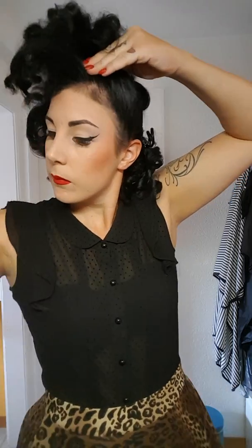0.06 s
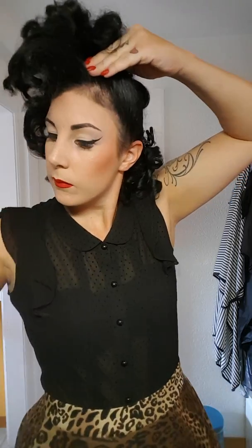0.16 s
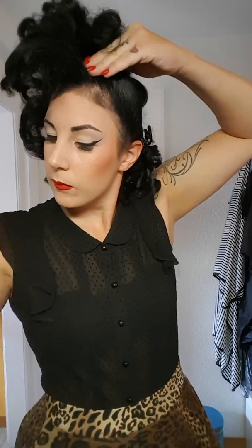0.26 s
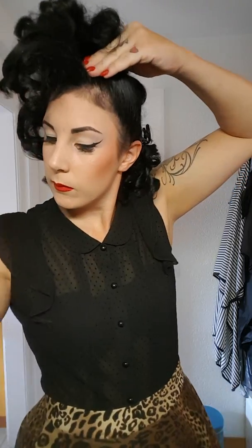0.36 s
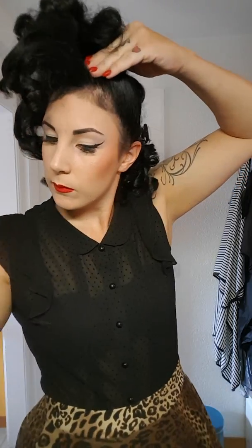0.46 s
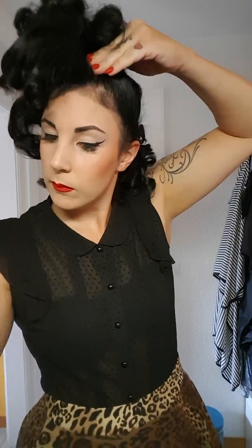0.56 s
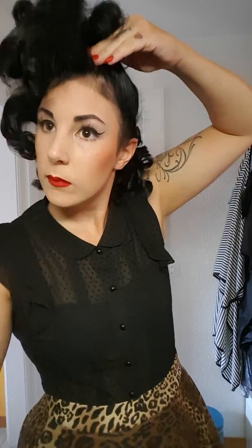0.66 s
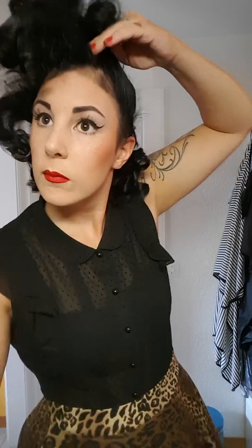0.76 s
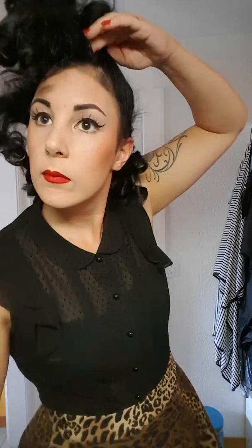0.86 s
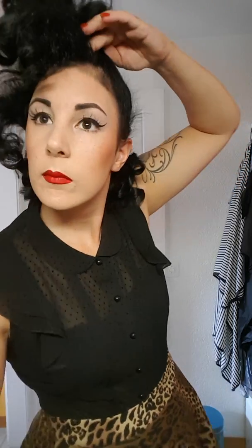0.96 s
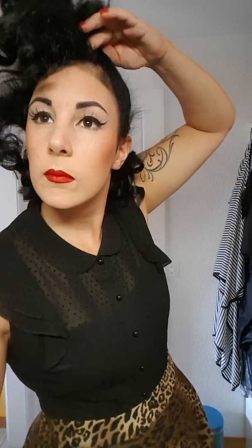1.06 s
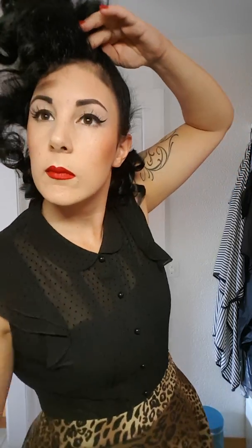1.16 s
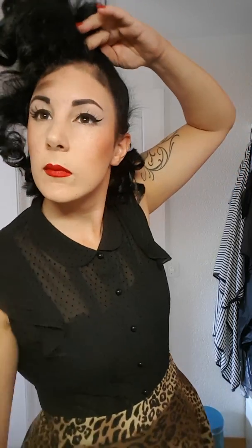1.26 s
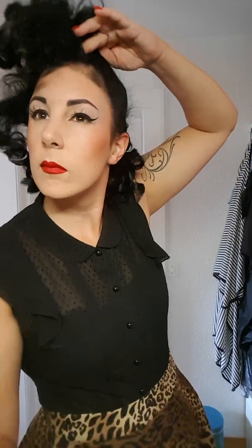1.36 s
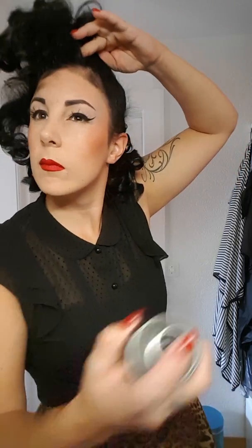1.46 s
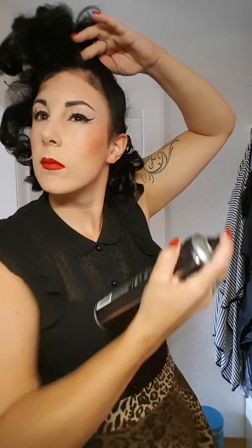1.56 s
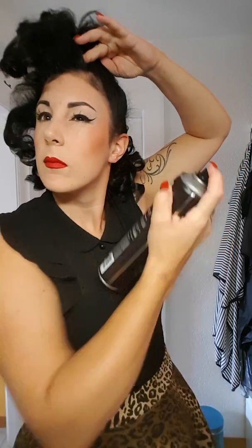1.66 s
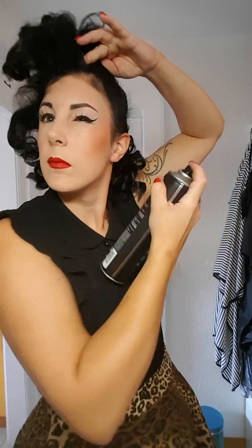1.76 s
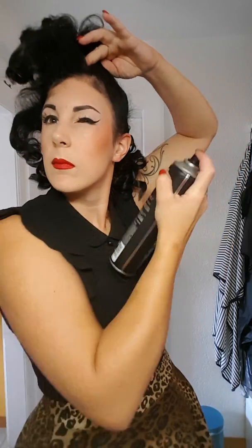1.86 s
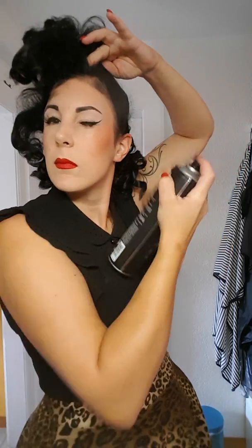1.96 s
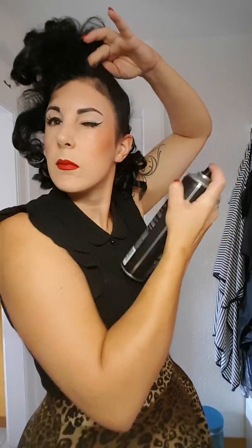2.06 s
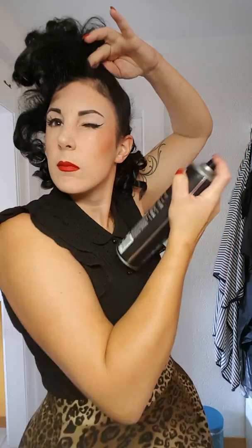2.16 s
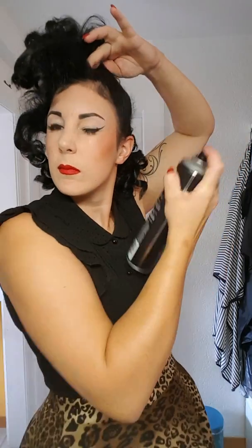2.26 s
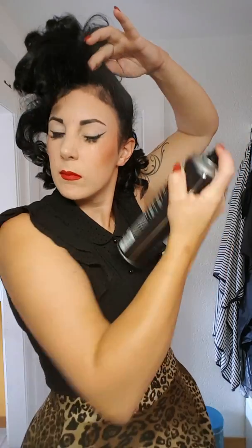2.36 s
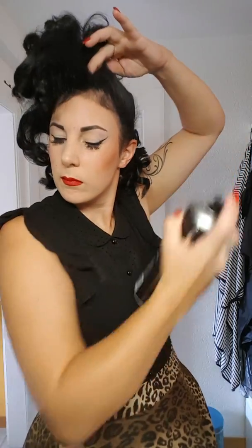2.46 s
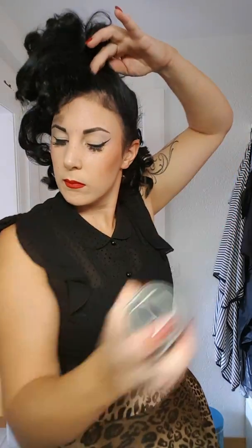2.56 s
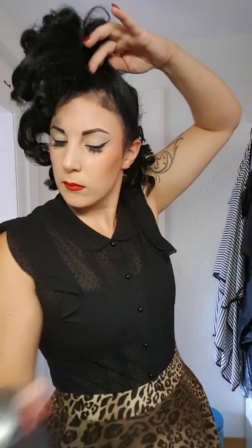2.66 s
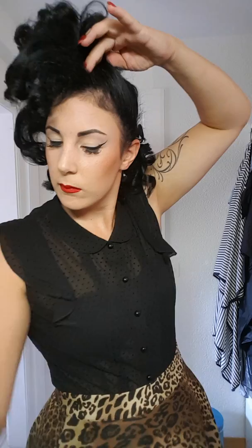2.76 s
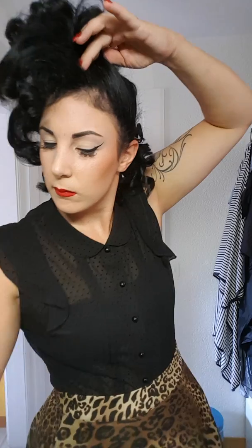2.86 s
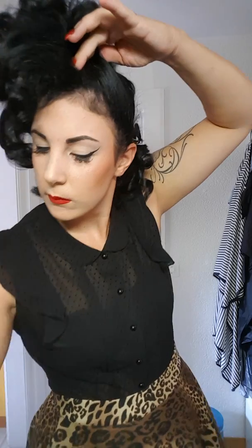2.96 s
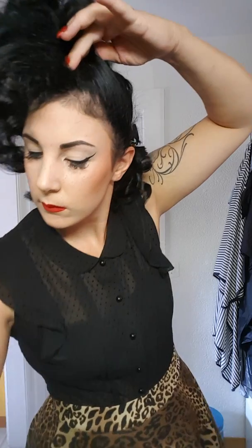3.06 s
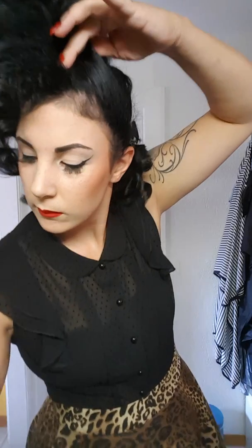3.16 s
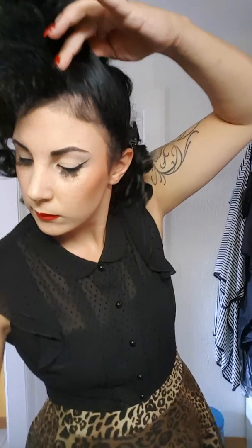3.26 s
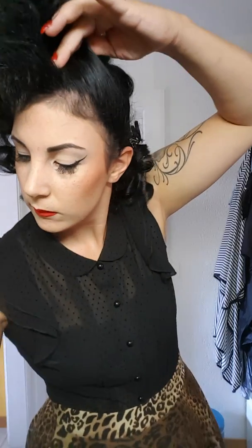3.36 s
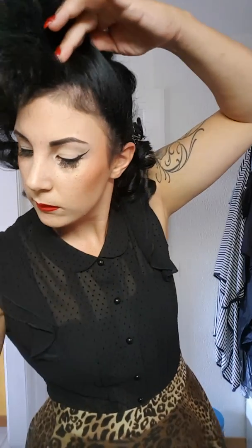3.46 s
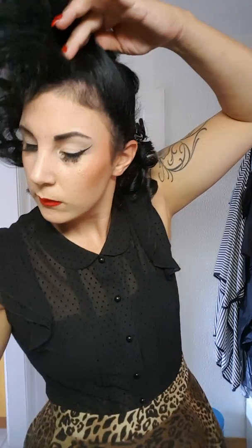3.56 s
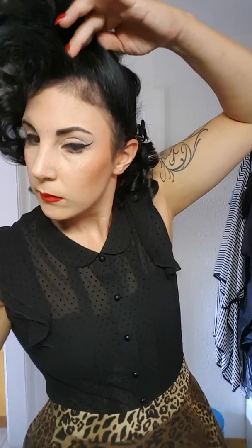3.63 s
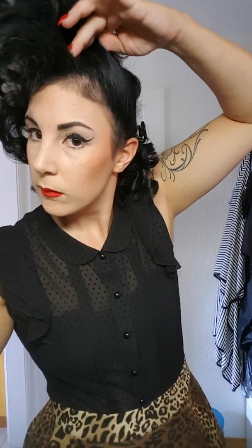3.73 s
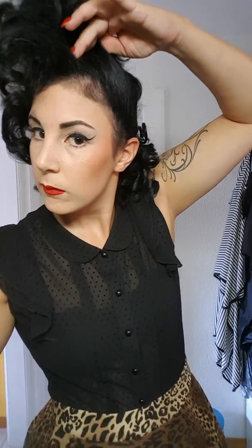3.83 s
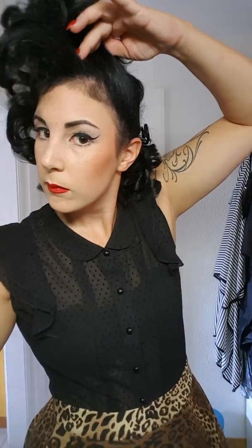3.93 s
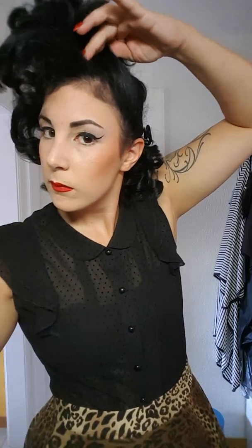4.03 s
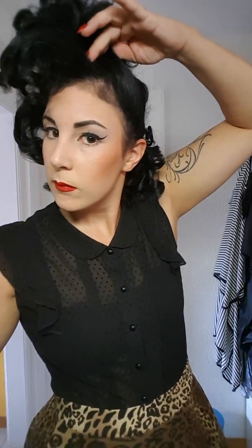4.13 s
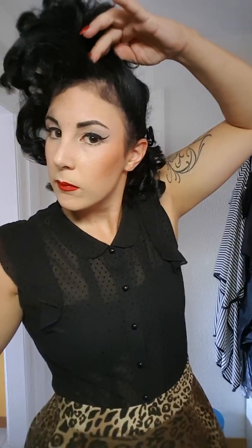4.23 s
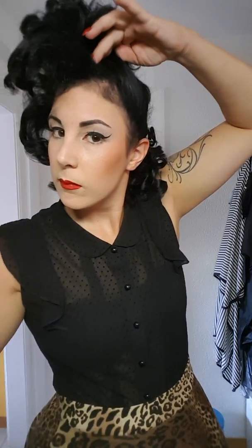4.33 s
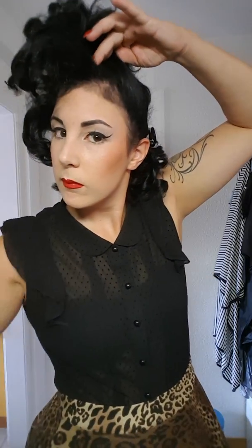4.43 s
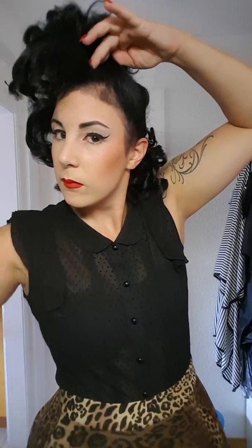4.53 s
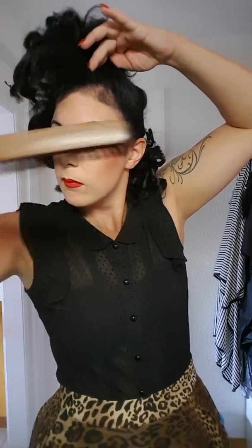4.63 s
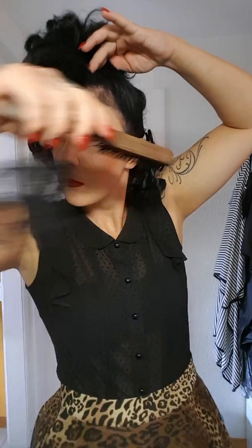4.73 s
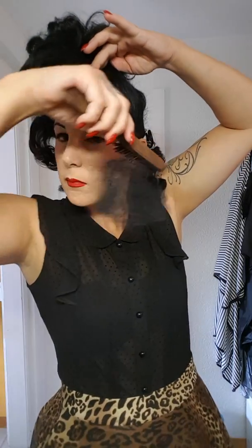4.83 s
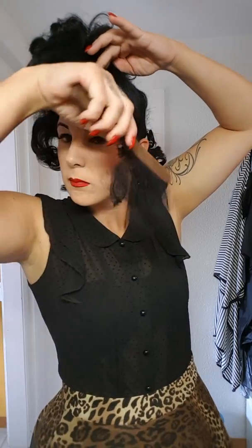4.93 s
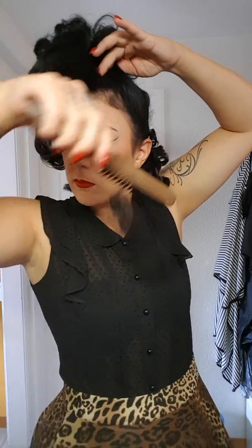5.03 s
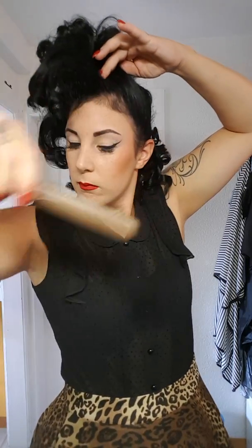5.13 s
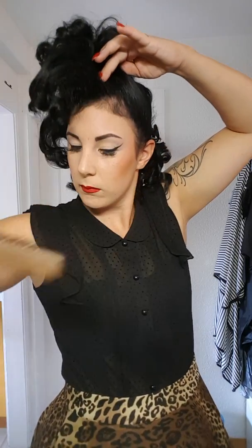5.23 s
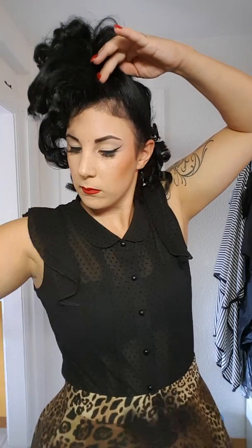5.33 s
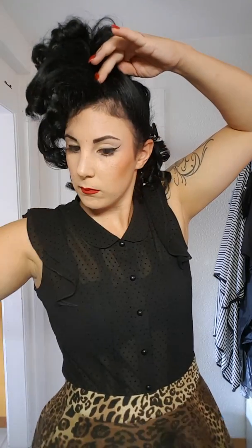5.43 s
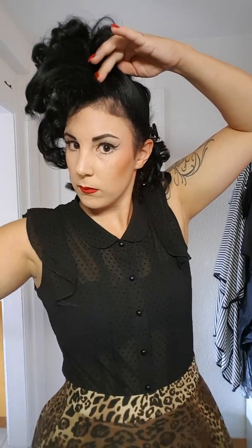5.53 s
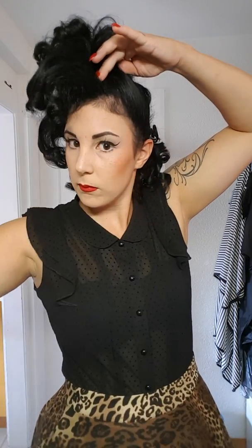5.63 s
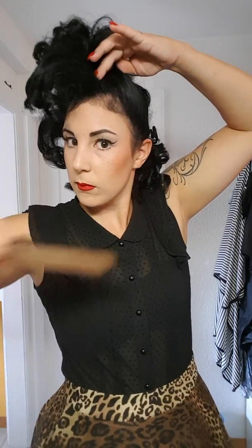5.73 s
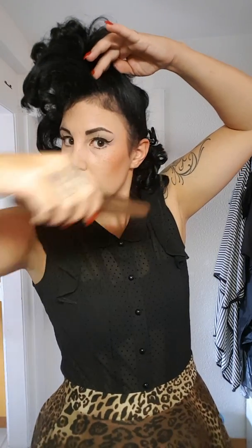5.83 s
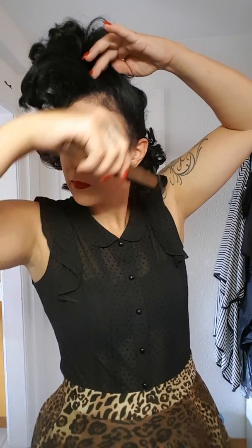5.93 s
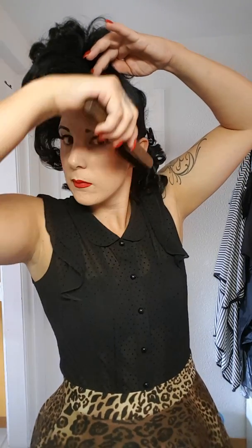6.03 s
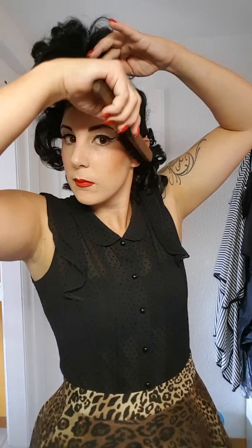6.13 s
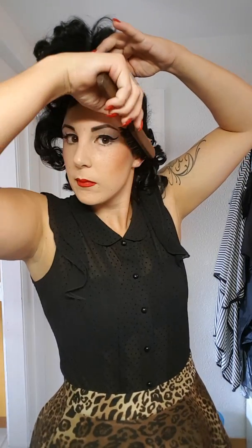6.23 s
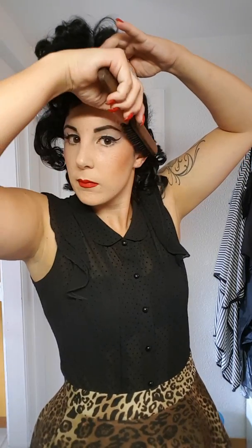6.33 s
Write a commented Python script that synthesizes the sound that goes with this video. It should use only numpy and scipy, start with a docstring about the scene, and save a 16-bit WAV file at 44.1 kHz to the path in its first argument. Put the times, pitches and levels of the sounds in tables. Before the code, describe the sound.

The sound is close, in a small room with a low hush and engines droning faintly outside. From about 0.8 seconds, fingers rustle softly through hair, with tiny snaps, rubs and light taps, continuing until around 4.5 seconds. At 1.9 seconds a hairspray can starts with a small wet spurt and gives one bright hiss, ending near 2.5 seconds. At 3.2 seconds the can is set down hard on a shelf with a loud, briefly ringing thud, followed by a light metallic clink at 3.7 seconds. From 3.8 seconds a wooden brush is dragged along the shelf in short scrapes and hollow knocks. These build to the loudest moment, at about 4.5 to 4.7 seconds, a quick wooden clatter with a bright rasp of bristles flicking over the edge. Afterwards only the quiet room and faint hum remain, with a soft stir of air from an arm near 5.9 seconds.

```python
"""Hairspray and a wooden brush

Hair is styled in a small room, close to a phone on a shelf. Friction between strands makes it rustle,
and the turbulent jet of a spray can hisses once. The can is set down hard, exciting the shelf's modes;
then a wooden brush is dragged off with a scrape and a clatter. Engines drone faintly outside."""
import sys
import numpy as np
from scipy import signal
from scipy.fft import rfft, irfft, next_fast_len
from scipy.io import wavfile

SR = 44100
rng = np.random.default_rng(int(sys.argv[2]) if len(sys.argv) > 2 else 0)


def wav_out(sig):
    """Save sig, one row per channel (or a flat mono array), as 16-bit PCM at SR to the path in sys.argv[1]."""
    wavfile.write(sys.argv[1], SR, np.round(np.clip(np.atleast_2d(sig).T, -1, 1) * 32767).astype(np.int16))


N = 281955
T = np.arange(N) / SR
RESPONSE_T = T[:SR // 2]  # time axis of an impulse response
PORT_LAG_S = .00042  # travel time between the phone's two microphone ports


# spectrum of the jet: frequency_hz, gain_db
JET_SPECTRUM = [(500, -24), (800, -17.5), (1280, -20), (1790, -11.5), (2500, -8), (2900, -13.5),
                (4000, -11.5), (5300, -9), (7600, -10), (9900, 0), (14200, 0), (16500, -8)]

def spray(level_db=-33.5, pan_db=2, wave_hz=3.03, wave_db=1.06, nearest_s=1.997, spurt_s=1.95):
    """Turbulence: a jet radiates broadband hiss, opening with a lower, wetter spurt of liquid."""
    jet = unit(ports(rng.standard_normal(N), bearing=-.33, pan_db=0)) + diffuse(N)
    hiss = wall_echo(colour(jet, JET_SPECTRUM)) * undb([[pan_db / 2], [-pan_db / 2]])
    valve = gesture(1.902, length_s=.57, attack_s=.054, release_s=.034)
    # the hand waves the jet towards the phone and away
    aim_db = wave_db * np.cos(2 * np.pi * wave_hz * (T - nearest_s))
    spurt_spectrum = [(600, -11), (850, 5), (1250, -8.5), (1900, 8.5), (2600, -35), (3200, -30)]
    spurt = unit(colour(diffuse(N), spurt_spectrum))
    spurt_envelope = np.exp(-np.maximum((spurt_s - T) / .018, (T - spurt_s) / .075))
    flutter_db = .35 * walk(120)
    return hiss * valve * undb(level_db + aim_db + flutter_db) + undb(-48) * spurt * spurt_envelope


# the can lands, then its rim settles: start_s, relative_level_db
CAN_IMPACTS = [(3.1793, 2), (3.1859, -5.5), (3.1926, -12)]
# spectrum of the thud: frequency_hz, gain_db
THUD_SPECTRUM = [(30, -15.5), (60, -12), (120, -4.5), (234, -4), (280, -11.5), (400, 2), (532, -9),
                 (600, -0.5), (790, -11.5), (1150, -7), (1470, -18.5), (1740, -12), (2100, -18),
                 (2500, -32), (3400, -36), (4500, -45), (16000, -70)]
# modes of the shelf: frequency_hz, relative_level_db, t60_s
SHELF_MODES = [(120.4, -13, 0.42), (148, -13, .3), (239.8, -11, 0.28), (383, -7.5, 0.3), (408, -12, .25),
               (455, -5.5, .28), (574, -2, 0.29), (598, -28.5, .9), (641, -7.5, .2), (708, -2.5, 0.09),
               (745.5, -7, 0.22), (808, -3, 0.29), (916, -12.5, .22), (873, -8, .2), (987, -3.5, 0.19),
               (1165, -10, 0.41), (1248, -5, 0.12), (1340, -18.5, 0.1), (1527, -6.5, .17),
               (1745, -16.5, 0.44)]
# modes of the can's thin wall: frequency_hz, relative_level_db, t60_s
CAN_MODES = [(2160, 13.5, 0.084), (2560, -13, .08), (3380, 8, 0.039), (3640, 5, 0.058), (3970, 0, 0.056),
             (4680, -6, 0.27), (6030, 0, 0.034), (7500, -2, 0.046)]

def can(landing_db=-12.5, let_go_s=3.7045, clink_db=-39):
    """Impact excitation: the can thuds and rings the shelf's modes; its wall clinks as it is let go."""
    path = room(wet_db=4, t60_s=.26, bearing=.8, pan_db=-3.5) + undb(-25) * room(wet_db=19, t60_s=.56)
    thud = unit_hit(colour(path, THUD_SPECTRUM)) * undb([[-.7], [.7]])
    shelf_ring = unit_hit(ports(modes(SHELF_MODES), bearing=.8, pan_db=-4.5))
    start_s, impact_db = np.transpose(CAN_IMPACTS)
    landing = through(blows(start_s, impact_db), thud) + through(blows(start_s[:1], [0]), shelf_ring)
    clink = unit_hit(ports(modes(CAN_MODES), bearing=.68, pan_db=-1.5))
    reverb_spectrum = [(300, -26), (1000, -2.5), (1800, -8), (2300, 5),
                       (2900, -5.5), (3500, 3.5), (5000, -9)]
    clink += undb(-5) * unit_hit(colour(room(wet_db=14, t60_s=.19), reverb_spectrum))
    return undb(landing_db) * landing + through(blows([let_go_s], [clink_db]), clink)


# knocks of the brush, levels relative within a column: start_s, click_db, boom_db, wood_db
BRUSH_KNOCKS = [(3.7784, -54.5, -33.5, -71), (3.9348, -60, -45, -44), (3.939, -55, -37, -30.5),
                (3.996, -42, -33, -39), (4.0226, -37, -26.5, -26), (4.047, -76, -28, -53),
                (4.0763, -41.5, -32, -40), (4.181, -54, -28, -31), (4.2, -68, -31, -57),
                (4.2268, -41, -23, -36.5), (4.2619, -37.5, -27.5, -36.5), (4.4939, -49, -27, -31.5),
                (4.5138, -29.5, -52, -35), (4.5285, -23.5, -25, -28), (4.553, -20, -11, -25),
                (4.588, -19, -19, -29.5), (4.5924, -27, -31.5, -26), (4.628, -20.5, -36, -30),
                (4.6499, -34, -38, -32)]
# spectrum of the wooden clack: frequency_hz, gain_db
CLACK_SPECTRUM = [(330, -11), (385, -6.5), (520, -8.5), (595, -4), (720, -15), (815, -9), (980, -5.5),
                  (1160, -6), (1450, -5.5), (1800, -9.5), (2130, -25), (3000, -27), (6000, -36.5)]
# modes of the handle: frequency_hz, relative_level_db, t60_s
HANDLE_MODES = [(400, 1, 0.103), (585, -0.5, 0.19), (844.6, -3, 0.31), (1136, -6.5, 0.22), (1215, -11, .16),
                (1350, 8, 0.14), (1440, -16, .16), (1555, -5.5, .15), (1795, 5, 0.067), (2050, -2, 0.081),
                (2190, -3.5, 0.062), (2560, -17, 0.047), (3240, -11, 0.11)]
# spectrum of the contact click: frequency_hz, gain_db
CLICK_SPECTRUM = [(1400, -23), (1800, 7), (2150, 13), (2900, 4), (4500, -0.5), (6800, -6), (9000, -8.5),
                  (11500, -13.5), (16000, -23.5)]

def brush_knocks(boom_hz=220, boom_peak_s=.0064):
    """Damped free vibration: each knock clicks, rings the wooden handle and makes the shelf boom."""
    start_s, click_db, boom_db, wood_db = np.transpose(BRUSH_KNOCKS)
    # the board needs about a cycle to reach its full swing
    swing = RESPONSE_T * np.exp(-RESPONSE_T / boom_peak_s) * np.sin(2 * np.pi * boom_hz * RESPONSE_T)
    reverb_spectrum = [(160, -9.5), (220, 9.5), (310, -1.5), (400, 0), (480, -10)]
    reverb = colour(room(wet_db=23, t60_s=.4), reverb_spectrum)
    boom = unit_hit(ports(swing, bearing=.41, pan_db=-1)) + undb(-7.5) * unit_hit(reverb)
    clack = unit_hit(colour(room(wet_db=0, t60_s=.22, pan_db=-1.5), CLACK_SPECTRUM))
    handle = unit_hit(ports(modes(HANDLE_MODES), bearing=.8, pan_db=-2.5))
    click = unit_hit(colour(room(wet_db=-2, t60_s=.25, bearing=.6, pan_db=5.5), CLICK_SPECTRUM))
    return (undb(-4) * through(blows(start_s, boom_db), boom)
            + undb(-.5) * through(blows(start_s, wood_db, scuff=.64, scuff_s=.0031), clack)
            + undb(-8) * through(blows(start_s, wood_db), handle)
            + undb(-8) * through(blows(start_s, click_db, scuff=1.6, scuff_s=.004), click))


# pulls of the brush along the shelf: start_s, length_s, relative_scrape_db, relative_rumble_db
BRUSH_PULLS = [(3.685, 0.11, -69, -50), (3.855, 0.056, -52, -44.5), (3.935, 0.17, -48, -37.5),
               (4.193, 0.095, -58, -44), (4.419, 0.058, -40.5, -39.5), (4.516, 0.13, -35.5, -30.5)]
# spectrum of the scrape: frequency_hz, gain_db
SCRAPE_SPECTRUM = [(300, -11), (420, 8), (700, 8.5), (1200, 3), (2200, 1.5), (3000, -11), (4000, -14.5),
                   (6000, -45.5), (15000, -42.5)]

def brush_drag(attack_s=.041):
    """Sliding friction: with each pull the bristles scrape and the shelf rumbles under them."""
    slips = through(grains(spread_db=6), room(wet_db=9, t60_s=.2))
    scrape = unit(colour(slips, SCRAPE_SPECTRUM))
    rumble_spectrum = [(120, -10), (160, -6.5), (220, 6.5), (280, 6.5), (340, -11), (400, -7), (520, -23)]
    rumble = unit(colour(diffuse(N), rumble_spectrum))
    return undb(-1) * sum(undb(scrape_db) * scrape * gesture(start_s, length_s, attack_s, .052)
                          + undb(rumble_db) * rumble * gesture(start_s, length_s, attack_s, .033)
                          for start_s, length_s, scrape_db, rumble_db in BRUSH_PULLS)


# tufts flick over the shelf's edge: start_s, level_db
TUFT_FLICKS = [(4.527, -38), (4.5528, -20), (4.586, -24.5), (4.628, -36)]

def bristle_flicks():
    """Elastic recoil: as the brush comes free, bent tufts spring back, each with a short bright rasp."""
    envelope = sum(undb(level_db) * gesture(start_s, length_s=.009, attack_s=.002, release_s=.003)
                   for start_s, level_db in TUFT_FLICKS)
    slips = grains(spread_db=3.5) * envelope
    rasp_spectrum = [(1400, -4.5), (1800, 18.5), (2150, 6), (2900, -7), (4500, -6),
                     (6800, -1), (9000, -1.5), (11500, 1), (16000, -3.5)]
    rasp = colour(room(wet_db=-6.5, t60_s=.21), rasp_spectrum)
    return through(slips, np.sqrt(2) * rasp / np.linalg.norm(rasp))


# finger strokes through the hair: start_s, length_s, relative_level_db
FINGER_STROKES = [(0.799, 0.2, -62), (1.205, .09, -65), (1.298, .012, -52), (1.34, 0.045, -58),
                  (1.478, 0.045, -63), (1.7, 0.07, -65), (1.864, 0.027, -62.5), (2.664, 0.043, -65.5),
                  (2.776, 0.1, -59.5), (2.89, 0.17, -65), (3.324, 0.043, -65), (3.402, .014, -62.5),
                  (3.95, .16, -66.5), (4.322, 0.031, -57), (4.432, 0.013, -56.5)]
# spectrum of the rustle: frequency_hz, gain_db
RUSTLE_SPECTRUM = [(880, -69.5), (1500, -17.5), (1790, -12.5), (1940, -9), (3590, -7.5), (5940, -8),
                   (12400, -6), (16000, -9.5)]
# small snaps of nails, hair and nozzle, and the tick of the can's rim as it lands: start_s, level_db
SNAPS = [(1.306, -52.5), (1.91, -56), (2.788, -62.5), (3.187, -38), (3.7038, -54.5), (4.294, -63)]

def hair(attack_s=.015, release_s=.031, sag_db_per_s=9):
    """Stick-slip friction: strands crackle finely over a soft hiss, with a few sharper snaps."""
    slips = unit(through(grains(spread_db=7.5), room(wet_db=6.5, t60_s=.25, bearing=0)))
    rustle = unit(colour(slips + undb(1) * diffuse(N), RUSTLE_SPECTRUM))
    snap_spectrum = [(2500, -8.5), (4000, -.5), (6000, -6.5), (10500, -1.5), (16000, -10)]
    snap = unit_hit(colour(room(wet_db=-6.5, t60_s=.18), snap_spectrum))
    snaps = through(blows(*np.transpose(SNAPS), scuff=1.82, scuff_s=.0039), snap)
    effort = undb(-73.5) * gesture(.81, 3.7, attack_s, release_s)  # the hand that holds the hair
    for start_s, length_s, level_db in FINGER_STROKES:
        sag_db = sag_db_per_s * np.maximum(T - start_s, 0)  # a stroke eases as strands come loose
        stroke = undb(level_db - sag_db) * gesture(start_s, length_s, attack_s, release_s)
        effort = np.maximum(effort, stroke)
    return undb(1.5) * wall_echo(rustle) * effort + snaps


# faint whistly rubs: peak_s, width_s, level_db, centre_hz, bandwidth_hz
SLIDING_CONTACTS = [(0.99, 0.035, -63, 3400, 1600), (1.27, 0.06, -70, 3200, 900),
                    (1.4, 0.22, -70, 1110, 80), (1.53, 0.04, -68, 2700, 400), (1.68, 0.05, -64, 1480, 350),
                    (1.81, 0.04, -61.5, 1510, 170), (4.343, 0.022, -54.5, 3950, 1000),
                    (4.41, 0.05, -60.5, 3650, 1200), (4.345, .028, -63.5, 11000, 2000)]

def rubs():
    """Resonance: each sliding contact sings briefly in one band of its friction noise."""
    noise = diffuse(N)
    return sum(unit(band(noise, centre_hz, bandwidth_hz)) * swells([(peak_s, width_s, level_db)])
               for peak_s, width_s, level_db, centre_hz, bandwidth_hz in SLIDING_CONTACTS)


# arm and sleeve stir the air: peak_s, width_s, level_db
ARM_GUSTS = [(3.1, 0.11, -76), (3.165, 0.005, -41), (3.24, 0.09, -40.5), (5.9, 0.06, -46), (6.3, .1, -64)]
# hand and blouse brush softly: peak_s, width_s, level_db
CLOTH_SWISHES = [(.97, 0.015, -65), (3.11, .03, -60.5), (5.9, 0.09, -70)]
# light taps of hand and can: start_s, level_db
LIGHT_TAPS = [(.945, -55.5), (.972, -49), (3.162, -58.5), (3.875, -63)]
# spectrum of a tap: frequency_hz, gain_db
TAP_SPECTRUM = [(200, 2.5), (400, -7.5), (580, 4), (800, -12.5), (1600, -8), (3500, -15.5), (7000, -24)]

def arm_movement():
    """Air displacement, friction and impact: arms fan the phone, cloth swishes and the hand taps."""
    air = unit(colour(diffuse(N), [(22, 2.5), (45, -1.5), (90, -8), (200, -21), (400, -30)]))
    cloth = unit(colour(diffuse(N), [(400, -1.5), (700, 3.5), (1600, -3), (3500, -11), (7000, -21)]))
    tap_force = blows(*np.transpose(LIGHT_TAPS), scuff=1)
    tap = unit_hit(colour(room(wet_db=3.5, t60_s=.27), TAP_SPECTRUM))
    return air * swells(ARM_GUSTS) + cloth * swells(CLOTH_SWISHES) + through(tap_force, tap)


# an engine idling outside: time_s, pitch_hz, level_db
ENGINE_IDLING = [(0, 43.64, -55), (1.5, 43.96, -58), (2.4, 46.02, -50), (3.0, 47.76, -59.5),
                 (3.6, 49.93, -54.5), (4.9, 48.2, -66), (6.39, 50, -62.5)]
# another engine pulling away: time_s, pitch_hz, level_db
ENGINE_LEAVING = [(0, 54, -48.5), (.45, 57.7, -53.5), (.8, 61.9, -46.5), (.92, 66.6, -63.5),
                  (1.25, 73.9, -56.5), (1.6, 84.4, -80)]

def engine(course, overtones_db):
    """Periodic firing: a harmonic drone, heard through the wall, whose pitch follows engine speed."""
    time_s, pitch_hz, level_db = np.transpose(course)
    gain = undb(np.interp(T, time_s, level_db, left=-200, right=-200))
    return tone(np.interp(T, time_s, pitch_hz), overtones_db) * gain


# brief background tones: start_s, length_s, first_hz, last_hz, level_db, slope_db_per_octave
TONE_GLIDES = [(2.308, 0.18, 337, 356, -62.5, -8), (4.817, 0.26, 198, 193.3, -52, -13.5),
               (5.569, 0.033, 326, 332, -49.5, -14), (6.14, 0.225, 1250, 1225, -73, -33)]

def faint_tones():
    """Harmonic series: each tone swells, glides a little and fades, its overtones on a falling slope."""
    overtone_octaves = np.log2([2, 3, 4, 5])
    sound = np.zeros(N)
    for start_s, length_s, first_hz, last_hz, level_db, slope in TONE_GLIDES:
        pitch_hz = np.interp(T, [start_s, start_s + length_s], [first_hz, last_hz])
        envelope = gesture(start_s, length_s, attack_s=.17 * length_s, release_s=.33 * length_s)
        sound += undb(level_db) * tone(pitch_hz, slope * overtone_octaves, waver=.026) * envelope
    return sound


# spectrum of the quiet room: frequency_hz, gain_db
AMBIENT_SPECTRUM = [(70, -12.5), (105, -11), (135, -24), (200, -14.5), (300, -23.5), (380, -26.5),
                    (600, -32), (1100, -31.5), (1700, -34), (2800, -39), (4500, -45), (6500, -50.5),
                    (10000, -52.5), (15500, -44.5)]

def room_air(level_db=-58):
    """Ambient noise: a low, diffuse hush whose level wanders slightly."""
    return unit(colour(diffuse(N), AMBIENT_SPECTRUM)) * undb(level_db + .5 * walk(9))


def modes(table):
    """Modal superposition: a struck body rings as decaying sines, neighbours in opposite phase."""
    return sum((-1) ** k * undb(db - 60 * RESPONSE_T / t60_s) * np.sin(2 * np.pi * hz * RESPONSE_T)
               for k, (hz, db, t60_s) in enumerate(table))


def blows(times_s, levels_db, scuff=0, scuff_s=.003):
    """Contact force: one impulse a blow, plus an optional scuff as the surfaces slide."""
    size = len(RESPONSE_T)
    force = np.zeros(N + size)
    for start_s, gain in zip(times_s, undb(levels_db)):
        grit = rng.standard_normal(size) * np.exp(-RESPONSE_T / scuff_s)
        push = (RESPONSE_T == 0) + scuff * grit / np.linalg.norm(grit)
        start = int(start_s * SR)
        force[start:start + size] += gain * push / np.linalg.norm(push)
    return force[:N]


def grains(spread_db):
    """Heavy-tailed noise: dense tiny slips, a few much larger than the rest."""
    return unit(rng.standard_normal(N) * undb(spread_db * np.minimum(rng.exponential(size=N), 7)))


def tone(pitch_hz, overtones_db, waver=.015, flicker_db=3):
    """Random modulation: the pitch wavers and the overtones come and go."""
    phase = 2 * np.pi * np.cumsum(pitch_hz * (1 + waver * walk(25))) / SR
    overtones = sum(undb(db + flicker_db * walk(2.7)) * np.sin(k * phase)
                    for k, db in enumerate(overtones_db, start=2))
    return np.sqrt(2) * (np.sin(phase) + overtones)


def gesture(start_s, length_s, attack_s, release_s):
    """Amplitude envelope: a smooth attack, a hold until the length is up, an exponential release."""
    rise = np.sin(np.pi / 2 * np.clip((T - start_s) / attack_s, 0, 1)) ** 2
    return rise * np.exp(-np.maximum(T - start_s - length_s, 0) / release_s)


def swells(table):
    """Gaussian envelopes: one smooth rise and fall a row."""
    return sum(undb(db) * np.exp(-.5 * ((T - peak_s) / width_s) ** 2) for peak_s, width_s, db in table)


def walk(rate_hz):
    """Linear interpolation of random values: a drift with a spread near 1."""
    knots = rng.standard_normal(1024)
    return np.interp(T * rate_hz, np.arange(len(knots)), knots)


def ports(x, bearing, pan_db):
    """Time and level difference: positive bearing delays the left port, positive pan favours it."""
    samples = np.arange(len(x))
    delayed = np.interp(samples - round(bearing * PORT_LAG_S * SR), samples, x, left=0)
    return np.array([delayed * undb(pan_db / 2), x * undb(-pan_db / 2)])


def diffuse(size):
    """Diffuse field: noise from all sides is coherent at the two ports only at low frequencies."""
    mid, side = rfft(rng.standard_normal((2, size)))
    coherence = .88 * np.sinc(2 * np.fft.rfftfreq(size, 1 / SR) * PORT_LAG_S)
    mid, side = mid * np.sqrt(1 + coherence), side * np.sqrt(1 - coherence)
    return unit(irfft(np.array([mid + side, mid - side]), size))


def room(wet_db, t60_s, bearing=.7, pan_db=0):
    """Reverberation: a direct impulse, then reflections that build up and die away."""
    direct = ports(1. * (RESPONSE_T == 0), bearing, pan_db)
    build_up = 1 - np.exp(-(RESPONSE_T / .004) ** 2)
    tail = diffuse(len(RESPONSE_T)) * undb(-60 * RESPONSE_T / t60_s) * build_up
    return unit_hit(unit_hit(direct) + undb(wet_db) * unit_hit(tail))


def wall_echo(x, lag_s=.0024, echo_db=-8):
    """Comb filtering: one early reflection off the wall ripples the spectrum of a hiss."""
    return unit(x + undb(echo_db) * np.roll(x, round(lag_s * SR), axis=-1))


def colour(x, spectrum):
    """Minimum-phase filter through (frequency_hz, gain_db) points, falling steeply beyond the ends."""
    hz, db = np.transpose(spectrum)
    size = 2 * next_fast_len(x.shape[-1] // 2 + 2048)
    bins_hz = np.maximum(np.fft.rfftfreq(size, 1 / SR), 1)
    skirts = np.minimum(1, np.minimum(bins_hz / hz[0], hz[-1] / bins_hz)) ** 2
    gain = undb(np.interp(np.log(bins_hz), np.log(hz), db)) * skirts
    cepstrum = irfft(np.log(gain + 1e-6))
    # folding the cepstrum onto positive time makes the filter causal
    cepstrum[1:size // 2] *= 2
    cepstrum[size // 2 + 1:] = 0
    return irfft(rfft(x, size) * np.exp(rfft(cepstrum)))[..., :x.shape[-1]]


def band(x, centre_hz, bandwidth_hz):
    """Cascaded resonance: two passes steepen the skirts."""
    b, a = signal.iirpeak(centre_hz, centre_hz / (1.1 * bandwidth_hz), fs=SR)
    return signal.lfilter(b, a, signal.lfilter(b, a, x))


def through(x, response):
    """Convolution with an impulse response, for both ports."""
    return signal.fftconvolve(np.atleast_2d(x), np.atleast_2d(response), axes=-1)[:, :x.shape[-1]]


def undb(db):
    """Decibels to amplitude ratio."""
    return 10 ** (np.asarray(db) / 20)


def unit(x):
    """Power normalisation to rms 1."""
    return x / np.sqrt(np.mean(x ** 2))


def unit_hit(x):
    """Energy normalisation: a blow carries as much as 20 ms at rms 1."""
    return x / np.sqrt(np.mean(np.sum(x ** 2, axis=-1)) / (SR / 50))


def scene():
    """Superposition: the pressures of all sources add at the two ports."""
    foreground = hair() + spray() + can() + brush_knocks() + brush_drag() + bristle_flicks()
    handling = rubs() + arm_movement()
    air = room_air()
    idling = engine(ENGINE_IDLING, overtones_db=[-11, -19, -15])
    leaving = engine(ENGINE_LEAVING, overtones_db=[-22, -18])
    return foreground + handling + air + idling + leaving + faint_tones()


def record(dry):
    """Saturation and band limiting: the phone rounds the loudest peak and cuts the top treble."""
    low_pass = signal.ellip(10, .1, 80, 15950, fs=SR, output="sos")
    return signal.sosfilt(low_pass, np.tanh(dry))


dry = scene()
out = record(dry)
wav_out(out)
```